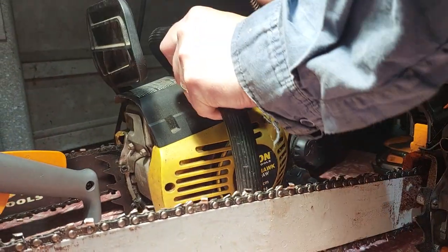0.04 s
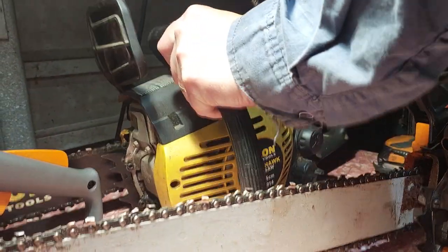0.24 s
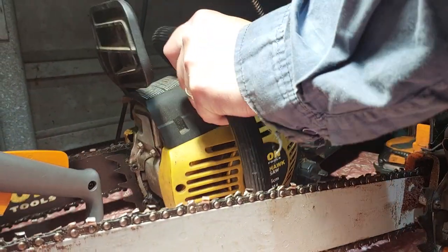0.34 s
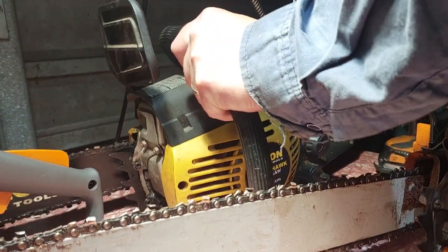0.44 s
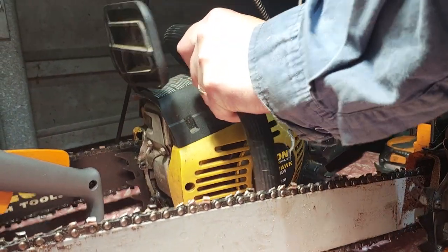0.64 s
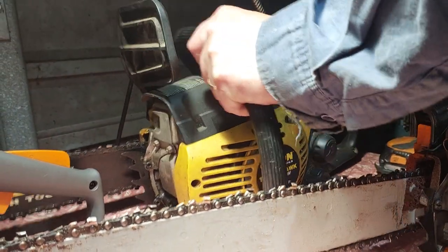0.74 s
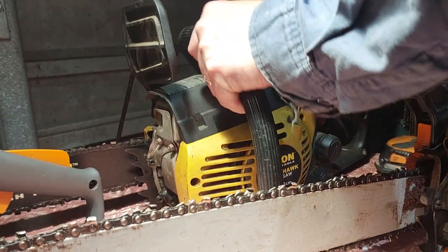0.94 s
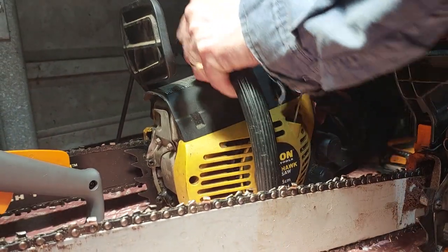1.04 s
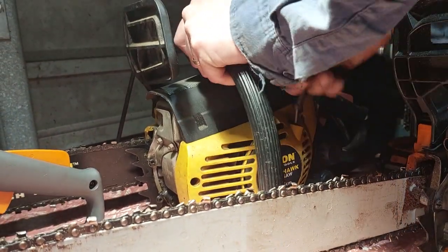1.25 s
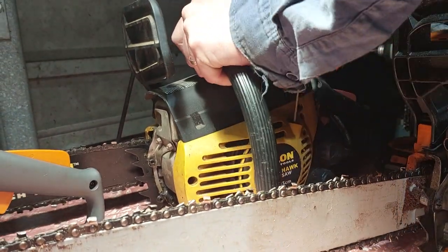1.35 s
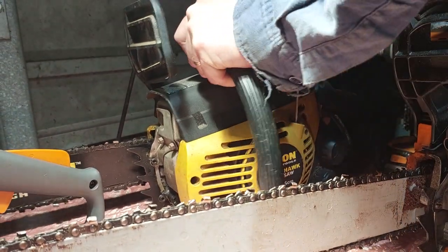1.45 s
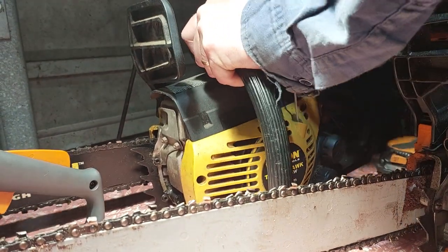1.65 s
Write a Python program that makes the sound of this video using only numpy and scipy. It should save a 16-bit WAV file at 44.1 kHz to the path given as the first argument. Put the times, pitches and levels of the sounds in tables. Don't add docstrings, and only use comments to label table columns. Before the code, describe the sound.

A chainsaw pull starter is worked twice, with no ignition. From 0.1 to 0.4 seconds, heavy thumps and plastic knocks jolt the bench; a second cluster follows at 0.6 to 0.85. The cord rasps brightly as steel pawls tick and ring from 0.9 to 1.2, slowing to a light clack near 1.3. Faint rocking thuds and a small knock at 1.7 end it, close in a short-echo workshop.

```python
import sys
import numpy as np
from scipy import signal
from scipy.fft import rfft, irfft, next_fast_len
from scipy.io import wavfile
from scipy.ndimage import map_coordinates

SR = 44100
rng = np.random.default_rng(int(sys.argv[2]) if len(sys.argv) > 2 else 0)


def volts_from_decibels(level):
    exponent = np.asarray(level, float) / 20
    return 10 ** exponent


def log_audio(samples):
    frames = np.atleast_2d(samples).T
    limited = np.clip(frames, -1, 1)
    pcm = np.round(limited * 32767).astype(np.int16)
    wavfile.write(sys.argv[1], SR, pcm)


N = 74970


def unit(x):
    return x / np.sqrt(np.mean(x ** 2) + 1e-20)


def along(points, hz):
    f, v = np.transpose(points)
    return np.interp(np.log(hz + 1), np.log(f + 1), v)


def filtered(x, response):
    n = x.shape[-1]
    m = next_fast_len(n + 8192)
    return irfft(rfft(x, m) * response(np.fft.rfftfreq(m, 1 / SR)), m)[..., :n]


def peak(hz, centre_hz, width_hz):
    return 1j * hz * width_hz / (centre_hz ** 2 - hz ** 2 + 1j * hz * width_hz)


def add(out, s, x):
    part = out[..., round(s * SR):][..., :x.shape[-1]]
    part += x[..., :part.shape[-1]]


def wobble(rate):
    knots = rng.standard_normal(int(N * rate / SR) + 4)
    return map_coordinates(knots, [np.arange(N) * rate / SR])


def air():
    # (frequency [Hz], level [dB per Hz])
    colour = [(20,5),(150,2.5),(450,-12.5),(1200,-19),(3200,-27),(8400,-40),(12000,-88.5),(16000,-78)]
    level_db, swell_db = -46, 1.2
    noise = rng.standard_normal((2, N))
    hush = unit(filtered(noise + 2.0 * noise[0], lambda f: volts_from_decibels(along(colour, f))))
    return volts_from_decibels(level_db + swell_db * wobble(9.53)) * hush


def room_answer(x):
    # (frequency [Hz], time to fall 60 dB [s])
    decay = [(110,.27),(550,.25),(3100,.2),(6000,.12),(12500,.11)]
    # (frequency [Hz], level [dB])
    loudness = [(110,-16),(410,-1.5),(900,-4.5),(2000,-9.5),(5500,-6),(12500,-13)]
    hz, t, z = signal.stft(rng.standard_normal((2, SR // 2)), SR, nperseg=256)
    z = z * volts_from_decibels(-60 * t / along(decay, hz)[:, None])
    z = z / np.linalg.norm(z, axis=2, keepdims=True)
    tail = signal.istft(z, SR, nperseg=256)[1]
    tail = np.pad(tail / np.linalg.norm(tail[0]), ((0, 0), (90, 0)))
    sent = filtered(x, lambda f: volts_from_decibels(along(loudness, f)))
    return signal.fftconvolve(sent[None], tail, axes=1)[:, :N]


def cord():
    # (time [s], level [dB])
    speed = [(0,-56.5),(.09,-56),(.16,-42),(.26,-48.5),(.3,-55.5),(.5,-64.5),(0.538,-52),(.62,-50),(0.782,-40),(.86,-65.5),(.95,-34),(1.19,-39.5),(1.3,-54),(1.349,-43),(1.388,-62.5),(1.652,-62.5),(1.7,-46)]
    # (frequency [Hz], level [dB per Hz])
    colour = [(500,10.5),(2000,5.5),(5000,2),(8000,-2),(11500,3),(14500,0.5),(16000,-9)]
    s, level_db = np.transpose(speed)
    noise = rng.standard_normal((2, N))
    noise = filtered(noise + 0.14 * noise[0], lambda f: volts_from_decibels(along(colour, f)))
    grains = volts_from_decibels(2.5 * wobble(350) + 3.3 * wobble(35.62))
    return volts_from_decibels(np.interp(np.arange(N) / SR, s, level_db)) * unit(noise * grains)


def pawls():
    # (time [s], peak level [dB], clatter level [dB], pawl ring level [dB])
    ticks = [(0.911,-50,16.5,-3.5),(0.9408,-20,1.5,3),(0.977,-18.5,-2,5.5),(1.0135,-21,1,1.5),(1.049,-19.5,1,2.8),(1.085,-17.5,-2,1.6),(1.123,-14,-8.5,-3.5),(1.1665,-22,1,-4),(1.2257,-25,-0.5,8),(1.3176,-41,16.5,-2),(1.347,-58,11,4.5),(1.369,-60,10,16.5)]
    # (pitch [Hz], level [dB], time to fall 60 dB [s], left-right [dB], left leads by [radians])
    flywheel = [(4538,-21,.08,0,0),(5137,-11,.13,1.8,-.8),(5472,-6,.14,-5.3,-1.5),(5528,-8,.16,2.4,.9),(5662,0,.15,6,-.3),(5744,-12,.08,2,0),(6368,-10,.07,-2.3,-.9),(6416,-14,.05,2,.5)]
    # (pitch [Hz], level [dB], time to fall 60 dB [s], left-right [dB], left leads by [radians])
    pawl = [(7620,-24,.08,0,1),(8260,-15,.08,0,-2),(8995,-26,.08,1,1),(10370,-22,.04,0,-1),(11162,-18,.1,-1,.1),(11510,-18,.05,0,1.5),(12055,-13,.065,0,-1.4),(12453,-11,.07,-3.6,2.4),(12560,-18,.08,0,2),(13531,-13,.07,-4.3,-.5),(14350,-19,.04,-2,2)]
    # (frequency [Hz], level [dB per Hz])
    colour = [(200,-10),(800,1),(2000,-3.5),(4500,-4.5),(6500,0.5),(9500,-12.5),(12500,-2.5),(16000,-11.5)]
    slowing_db = 18
    brake_s, brake_db = 1.17, 110
    steel_db, pawl_scatter_db = -1, 4
    rise_s, chatter_s, chatter_db = 0.001095, 0.0045, -4
    clatter_db, clatter_s = -2.5, 0.068
    main_hz = flywheel[2][0]

    out, t = np.zeros((2, N)), np.arange(SR // 4) / SR
    side = np.array([[.5], [-.5]])
    rise = 1 - np.exp(-t / rise_s)
    for s, db, tick_clatter_db, pawl_db in ticks:
        brake = brake_db * np.clip(s + t - brake_s, 0, .11)
        ring = np.zeros((2, len(t)))
        for hz, g, t60, pan_db, lead in flywheel + pawl:
            a, b, c = rng.standard_normal(3)
            level = g + 2 * np.tanh(a) + side * pan_db - 60 * t / t60
            if hz >= pawl[0][0]:
                level = level + pawl_db + pawl_scatter_db * np.tanh(a)
            else:
                level = level + steel_db
                if hz < main_hz:
                    level = level + slowing_db * (s - ticks[2][0])
                else:
                    level = level - brake
            ring += volts_from_decibels(level) * np.sin(2 * np.pi * hz * (1 + 0.00033 * b) * t + side * lead + c)
        add(out, s, volts_from_decibels(db) * ring * rise)
        again = np.roll(ring, -rng.integers(SR // 500), axis=1)[:, :-SR // 400]
        add(out, s + chatter_s, volts_from_decibels(db + chatter_db) * again)

        noise = rng.standard_normal((2, len(t)))
        noise = unit(filtered(noise + 0.35 * noise[0], lambda f: volts_from_decibels(along(colour, f))))
        fade = volts_from_decibels(-60 * t / clatter_s) + 0.99 * volts_from_decibels(-60 * t / 0.012)
        add(out, s, volts_from_decibels(db + clatter_db + tick_clatter_db) * noise * rise * fade)
    return out * volts_from_decibels(1.5 * wobble(250))


def case():
    # (time [s], peak level [dB], brightness [dB per octave], time to fall 60 dB [s])
    knocks = [(0.118,-32.5,-5.5,0.042),(.158,-24,-12,0.28),(0.209,-21,-6.5,0.069),(0.2216,-5,-4,0.041),(.233,-9.5,17.5,0.043),(0.249,-18.5,-0.5,0.11),(0.308,-26,-2,0.044),(0.335,-11.5,-1.5,0.042),(.546,-32.5,-5.5,0.077),(0.628,-33,-10,.045),(0.6606,-9.5,-3.5,0.045),(0.7446,-25,-4,0.036),(.7895,-5,1.5,0.09),(.7975,-10.5,-4.5,0.027),(.811,-13.5,-0.6,0.16),(0.905,-29.5,1.5,0.11),(.915,-26.5,-3.8,0.36),(.933,-18.5,-7,0.049),(1.318,-26.5,-1.3,0.012),(1.3401,-25.5,1,0.017),(1.372,-57,4,0.042),(1.683,-25,-8,0.061)]
    # (pitch [Hz], width [Hz], level [dB])
    resonances = [(398,134,-5),(696,77,0),(917,150,-1.5),(1256,77,-1.5),(1674,323,-3),(2000,430,-4.5),(2350,286,-2.5),(4300,3400,-8.5),(6100,1470,-12.5)]
    # (frequency [Hz], level [dB per Hz])
    settling = [(200,-9.5),(450,1),(1000,2),(2500,-9.5),(6000,-16.5),(12000,-45)]
    crack_db, blow = -24, 3.98
    loose_db, loose_s = -30, 0.36

    out, t = np.zeros((2, N)), np.arange(SR // 4) / SR
    for s, db, tilt_db, t60 in knocks:
        rattle = rng.standard_normal((2, len(t)))
        force = (rattle + 1.24 * rattle[0]) * volts_from_decibels(-60 * t / t60) - blow * np.exp(-t / 0.00025)
        vary = rng.normal(0, 3, len(resonances))

        def body(f):
            slope = volts_from_decibels(np.clip(tilt_db, -8, 4) * np.log2(np.minimum(f, 5000) / 1500 + .1))
            answer = volts_from_decibels(crack_db) * peak(f, 5300, 7500)
            for k, (centre, width, g) in enumerate(resonances):
                answer = answer + (-1) ** k * volts_from_decibels(g + vary[k]) * peak(f, centre, width)
            return slope * answer

        knock = filtered(force, body)
        knock = knock / np.abs(knock).max()
        loose = unit(filtered(rattle[:, ::-1], lambda f: volts_from_decibels(along(settling, f))))
        add(out, s, volts_from_decibels(db) * (knock + loose * volts_from_decibels(loose_db - 60 * t / loose_s)))
    return out


def bench(blows):
    swell_cycles = 0.29
    out, t = np.zeros(N), np.arange(SR // 4) / SR
    for s, db, hz, t60 in blows:
        swell = 1 - np.exp(-t * hz / swell_cycles)
        ring = np.sin(2 * np.pi * hz * t)
        add(out, s, -volts_from_decibels(db + 3.5 - 60 * t / t60) * swell * ring)
    return out


def scene():
    # (time [s], peak level [dB], pitch [Hz], time to fall 60 dB [s])
    first_pull = [(.006,-29.5,151,0.12),(.041,-34.5,138,0.19),(0.113,-7,141,0.013),(0.124,-18.5,177,0.073),(0.165,-15,298,0.0099),(0.17,-20.5,336,0.056),(0.19,-16,230,0.016),(0.209,-21.5,244,0.059),(0.222,2,142,0.025),(.23,-3.5,259,0.03),(0.24,-1,150,0.034),(.263,-11.5,153,0.047),(.276,-16,151,0.061),(0.308,-23,437,0.024),(0.314,-17.5,128,0.11),(0.334,-7.5,123,0.066),(.344,-20.5,259.7,0.097),(0.371,-18.5,137,0.054),(.411,-39,259.5,0.14)]
    # (time [s], peak level [dB], pitch [Hz], time to fall 60 dB [s])
    second_pull = [(.581,-33,188,0.047),(0.626,-6,139,0.013),(.636,-20.5,186,0.08),(.662,-8.5,140.5,0.073),(0.671,-11,148,0.059),(0.706,-18,144.5,0.092),(0.752,-17.5,138,0.16),(0.789,-6,144.2,0.071),(.807,0.5,155,0.047),(0.815,-20.5,181,0.028),(0.83,-20,264.7,0.081)]
    # (time [s], peak level [dB], pitch [Hz], time to fall 60 dB [s])
    rocking = [
        (0.934,-17,134,0.065),
        (1.074,-30.5,134,0.12),
        (1.241,-14.5,136,0.087),
        (1.292,-35,139.7,0.26),
        (1.358,-28,124.7,0.047),
        (1.418,-28,149,0.077),
        (1.487,-36.5,146,0.049),
        (1.573,-31.5,177.6,0.079),
        (1.691,-29,143,0.053),
    ]
    # (time [s], peak level [dB], pitch
    # [Hz], time to fall 60 dB [s])
    boards = [(.005,-36.5,624,0.013),(0.3359,-16,275,0.035),(.362,-30.5,407,0.023),(.405,-44,490,0.039),(0.609,-30.5,250,0.048),(0.6267,-22.5,430,.02),(0.639,-34,332,0.019),(.6615,-12,287.4,0.029),(.685,-22,286,0.031),(.704,-23.5,440,0.023),(.72,-33,304,.05),(0.861,-31,70,0.13),(0.942,-27.5,65.4,0.14),(1.001,-32.5,148,0.085),(1.049,-36.5,299.7,0.078),(1.245,-33,393,0.031),(1.575,-39.5,340,0.027)]
    # (time [s], peak level [dB], pitch [Hz], time to fall 60 dB [s])
    panels = [(.2215,-18,692,.04),(.308,-23,560,.035),(.335,-21,980,.035),(.3352,-23,2050,.026),(.336,-19,450,.04),(.546,-35,950,.025),(.5465,-40,1950,.02),(.661,-24,1990,.027),(.662,-24,1260,.03),(.6625,-21,450,.04),(.745,-33,1100,.02),(.7895,-13,735,.07),(.791,-25,3300,.03),(.793,-24,1600,.03),(.795,-22,2214,.05),(.799,-27,2700,.04),(1.3175,-30,937,.025),(1.318,-36,2450,.015),(1.3185,-31,6400,.02),(1.3412,-25,1051,.032),(1.342,-33,1700,.02),(1.683,-36,1350,.02)]
    # (frequency [Hz], half the left-right difference [dB])
    pan = [(65,2.3),(310,1.25),(2100,0.5),(6100,0.5),(13100,-0.4)]
    lead_ms = -0.075
    split_rad, split_hz = 0.88, 887
    side = np.array([[1], [-1]])

    def place(f):
        lead = f * lead_ms / 1000 / (1 + (f / 650) ** 2)
        return volts_from_decibels(side * along(pan, f)) * np.exp(2j * np.pi * side * lead)

    def split(f):
        return np.exp(side * 1j * split_rad / (1 + (split_hz / (f + 1)) ** 4))

    wood = bench(first_pull + second_pull + rocking + boards)
    plastic, steel = case(), pawls()
    body = filtered(wood + plastic + bench(panels), split)
    direct = filtered(body + steel, place)
    room = room_answer(wood + (plastic + steel)[0])
    return direct + room + cord() + air()


def band_limit(x):
    return signal.sosfilt(signal.butter(12, 16420, fs=SR, output="sos"), x)


def record(dry):
    low_cut_hz, top_hz = 70, 15600

    def band(hz):
        return 1j * hz / (low_cut_hz + 1j * hz) / (1 + (hz / top_hz) ** 70)

    mix = filtered(dry, band)
    return band_limit(mix)


dry = scene()
out = record(dry)
log_audio(out)
```